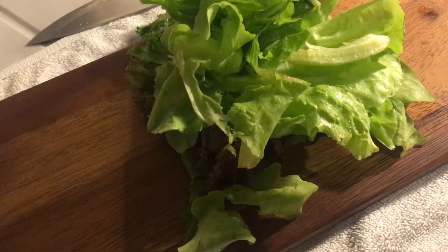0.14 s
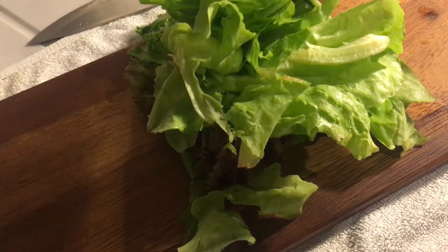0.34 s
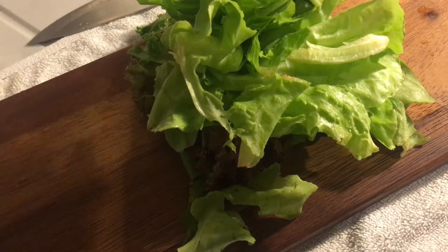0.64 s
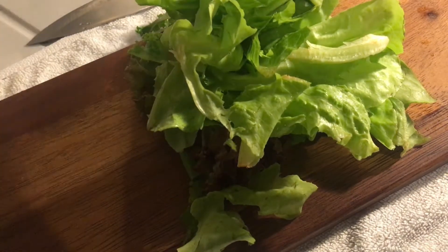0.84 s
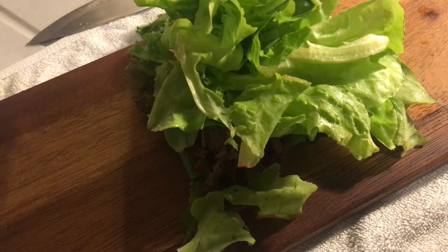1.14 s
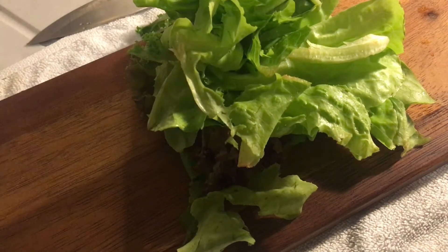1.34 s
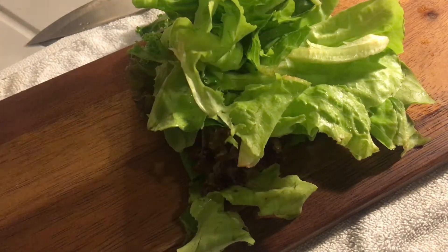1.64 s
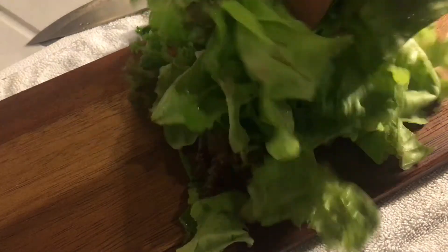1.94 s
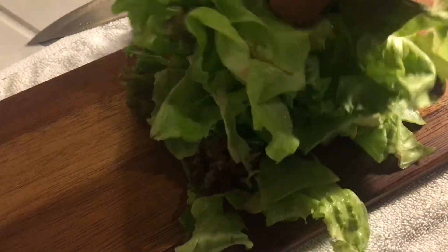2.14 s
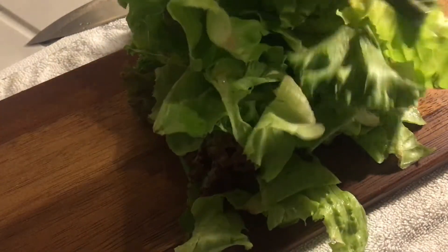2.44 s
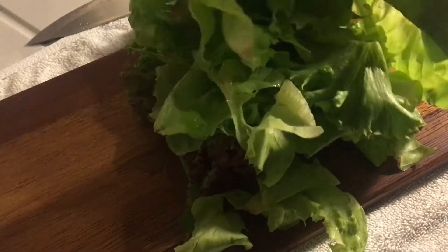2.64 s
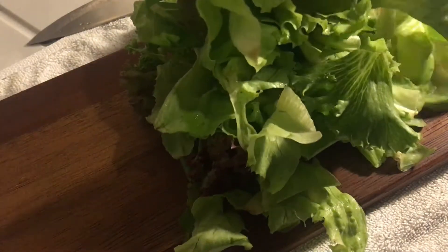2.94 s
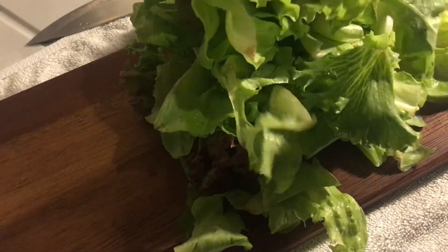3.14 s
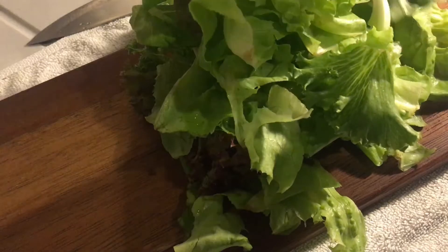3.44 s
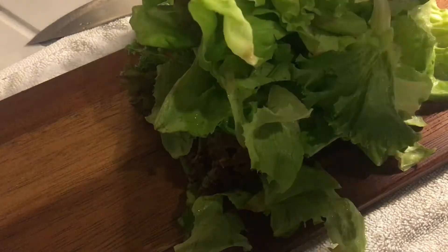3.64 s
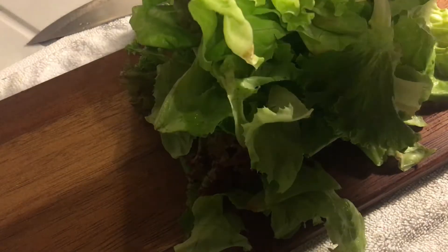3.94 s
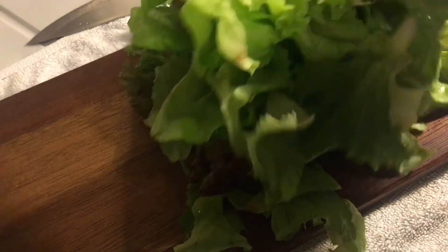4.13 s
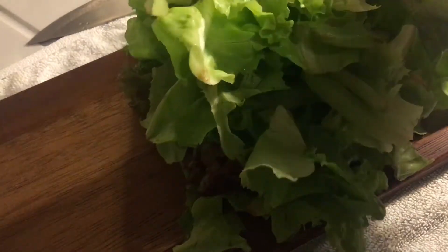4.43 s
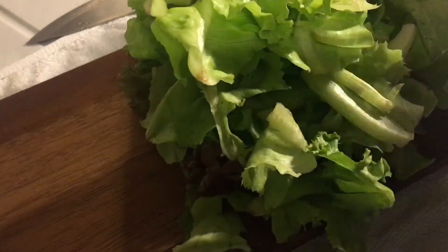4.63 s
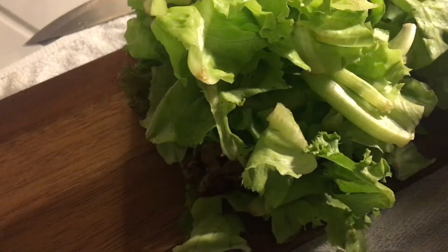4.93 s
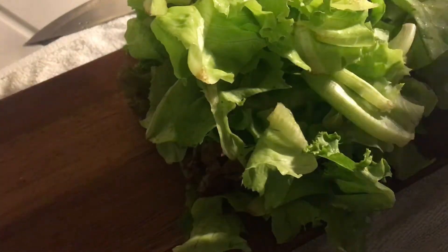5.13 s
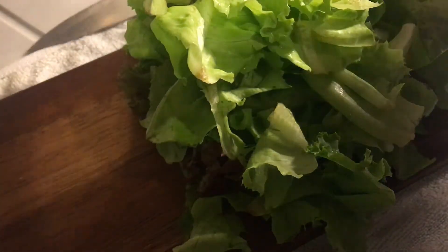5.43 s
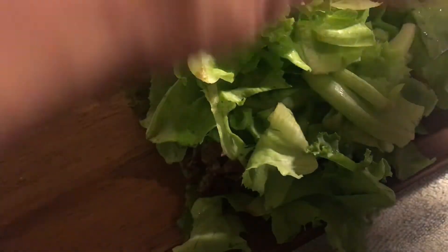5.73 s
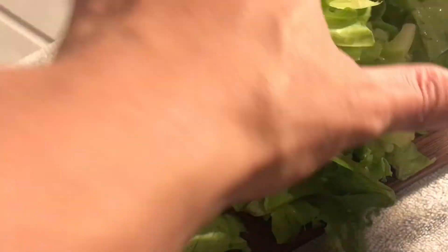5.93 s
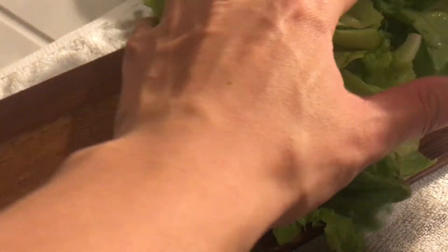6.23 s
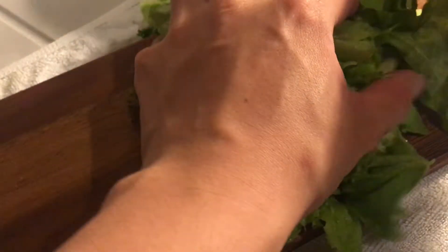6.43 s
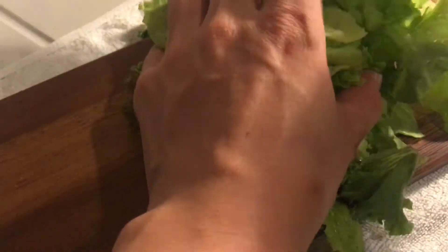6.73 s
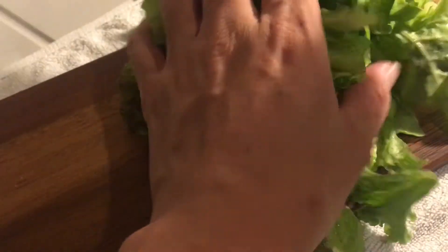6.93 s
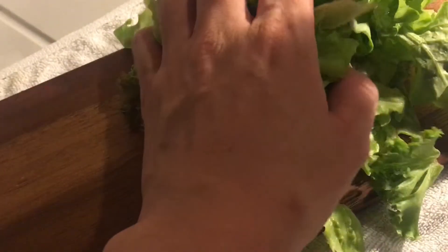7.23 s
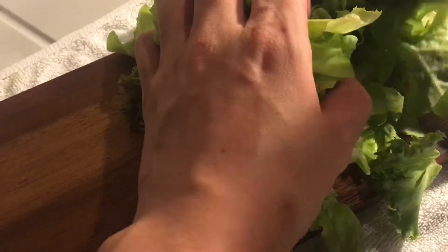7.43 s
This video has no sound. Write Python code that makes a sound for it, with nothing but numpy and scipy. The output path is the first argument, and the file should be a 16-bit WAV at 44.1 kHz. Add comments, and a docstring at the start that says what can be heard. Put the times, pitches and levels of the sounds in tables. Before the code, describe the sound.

Close to a small microphone in a kitchen, hands tear lettuce with a dense flurry of wet, crisp snaps and low board thuds. The crunching thins after about a second and a half, returns as softer crackles near three seconds, then drops to faint leaf sweeps. Late on come a squeaky rub, light rustling, a small board knock and a last crunch over low room rumble.

```python
"""Tearing lettuce in a kitchen

Hands tear and crumple lettuce on a wooden board, close to a small microphone.
Ribs snap as jerky noise bursts; leaves crackle with tiny pitched cracks, sweep as hiss and rub with a tone.
The board thuds with low noise and rings when knocked. Hum and hiss are filtered noise; echoes are sparse.
"""
import sys
import numpy as np
from scipy import signal
from scipy.io import wavfile
from scipy.ndimage import uniform_filter1d

SR = 44100
rng = np.random.default_rng(int(sys.argv[2]) if len(sys.argv) > 2 else 0)


def master(y):
    """Save y as 16-bit WAV."""
    cut = np.clip(np.atleast_2d(y).T, -1, 1)
    pcm = np.round(cut * 32767)  # scale
    wavfile.write(sys.argv[1], SR, pcm.astype(np.int16))


N = 333837
EDGE_HZ = 15800  # upper limit of the sound

# Colour of the kitchen's own sound. Each row: frequency in Hz, relative level per Hz in dB.
AIR_COLOUR = [(15, -32), (32, -10), (62, 2.5), (90, -2), (193, -10.5), (313, -11), (457, -18), (537, -18),
              (1050, -21.5), (1380, -28.5), (4260, -40.5), (4870, -44), (6050, -43.5), (10400, -50),
              (12800, -50.5), (15500, -53)]
# Hum of an appliance, a single row: frequency in Hz, width in Hz, level in dB.
APPLIANCE_HUM = (100.9, 6.7, -68)
# Weight of hands and leaves pressing on the board. Each row: start in seconds, time held in seconds,
# level in dB of the noisy part of the push.
BOARD_THUDS = [(0.0, 0.087, -44), (0.168, 0.17, -54), (0.302, 0.085, -50), (0.646, 0.093, -43),
               (0.746, 0.007, -34), (.785, 0.005, -41.5), (0.858, 0.098, -51), (1.322, 0.0061, -45),
               (2.697, 0.06, -50), (2.829, 0.1, -55.5), (2.982, 0.03, -59)]
# How the board rings. Each row: frequency in Hz, relative level in dB, time to fade by 60 dB in seconds.
BOARD_MODES = [(550, -4, .04), (805, 0, .055), (1170, -4, .04), (1945, -11, .03), (2735, -8, .016)]
# Fingertip knocking the board. Each row: start in seconds, level in dB of a 0 dB board mode.
BOARD_TAPS = [(7.2933, -25.5)]
# Colour of leaf sound at the microphone. Each row: frequency in Hz, relative level per Hz in dB.
LEAF_COLOUR = [(240, -7.5), (459, -1.5), (1220, 11), (1690, 2.5), (1930, 1), (2430, -4), (3570, -8),
               (4920, -15), (6280, -13.5), (10400, -20), (13500, -21.5), (15500, -21.5)]
# Leaf sweeping smoothly over leaf. Each row: middle in seconds, length in seconds,
# level of the middle band in dB, treble in dB relative to that.
LEAF_SWEEPS = [(3.993, 0.11, -73.5, 1.5), (4.092, 0.14, -61, -1.5), (4.258, 0.2, -72, -3),
               (4.646, 0.036, -77.5, 3.5), (5.063, 0.11, -68.5, -18), (5.277, 0.14, -72, -14),
               (5.55, 0.057, -73, 1.5)]
# A wet leaf sliding with a narrow rubbing tone. Each row: start in seconds, level in dB, tone in Hz.
LEAF_RUBS = [(6.047, -48.5, 720), (6.118, -58.5, 696), (6.205, -61.5, 737), (6.255, -57.5, 770)]
# Leaves moving in the hands, one spell a row. Each row: hollow part in dB and treble in dB, both relative
# to the middle band, then that band's level curve as pairs of time in seconds and level in dB.
HANDLING_SPELLS = [ (2.2, -7.5, [(0.0, -43), (0.3, -57), (0.88, -50), (0.98, -52.5), (1.13, -68),
                   (1.6, -72)]), (0.78, -0.5, [(1.7, -80), (1.76, -60), (1.95, -60), (2.2, -70.5),
                   (2.37, -75), (2.61, -71), (2.82, -58), (3.12, -79), (3.5, -77)]), (2.7, 1.5, [(5.8, -79),
                   (5.87, -71), (6.17, -68.5), (6.47, -66), (6.7, -63), (6.76, -78), (6.89, -67),
                   (7.0, -74.5)]), (3.7, 3, [(7.08, -65.5), (7.15, -66), (7.28, -53.5), (7.35, -71),
                   (7.57, -45.5)]), ]
# Ribs and veins that break. Each row: start in seconds, strength in dB, leaf ring in dB and treble in dB
# over the strength (all before the fixed trims in snaps), ring in Hz, time to fade by 60 dB in seconds.
RIB_SNAPS = [(0.0339, -17, -7, -14, 1160, 0.076), (0.0423, -21.5, -7, -8, 1140, 0.059),
             (0.0508, -17, -4, -18.5, 1080, 0.11), (0.0582, -24.5, -1.5, -29, 1090, 0.068),
             (0.092, -30, -7, -11, 1070, 0.037), (0.153, -29, -25, -2, 1050, 0.037),
             (0.2202, -32, -3, -27, 990, 0.14), (0.246, -32, 4.5, -19, 1050, 0.13),
             (0.2837, -31.5, -5, -4, 1220, 0.026), (0.2909, -26, -18, -7, 1060, 0.057),
             (0.3273, -23, -10, -15, 1170, 0.069), (0.3367, -21.5, -22, -4.5, 1860, 0.025),
             (0.345, -21, -13, -13, 1700, 0.031), (0.353, -18, -16, -35, 1160, 0.039),
             (0.362, -28.5, -7, -4, 1940, 0.067), (0.383, -20, -16, -4, 2240, 0.015),
             (0.4395, -38.5, 7, -11, 1085, 0.049), (0.476, -38.5, 1.5, 10.5, 2520, 0.021),
             (0.5694, -37, 3, -13, 1070, 0.066), (0.597, -30.5, -9.5, 2.5, 1120, 0.051),
             (0.6582, -24.5, -10, -16.5, 1230, 0.034), (0.668, -25, -8, -12.5, 920, 0.11),
             (0.6938, -22.5, -11.5, -12, 706, 0.039), (0.711, -29, -3, -13, 1510, 0.049),
             (0.72, -23, -9, -15, 1260, 0.059), (0.7279, -19.5, -17, -17, 1000, 0.084),
             (0.732, -29.5, -6, -7, 1020, 0.036), (0.7432, -25, -2, -14, 1400, 0.032),
             (0.748, -12.5, -13, -15.5, 910, 0.027), (0.7699, -33, -26, -3, 810, 0.093),
             (0.884, -27, -6.5, -15.5, 1240, 0.032), (0.9657, -30, 4, -11.5, 1160, 0.079),
             (1.0058, -20, -9.5, -16, 980, 0.043), (1.0453, -34.5, -12, -15, 727, 0.061),
             (1.0697, -37, -3, -23, 740, 0.081), (1.1288, -38.5, -0.5, 0, 1830, 0.022),
             (1.2025, -39.5, -10, -10.5, 1003, 0.055), (1.3275, -32.5, -8, -11, 1120, 0.031),
             (1.3434, -55, 8, -28, 970, 0.047), (1.401, -22, -12.5, -19, 1090, 0.045),
             (1.487, -43, -7, -11.5, 940, 0.028), (1.7145, -26.5, -10, -14.5, 1290, 0.074),
             (1.8803, -40.5, -2, -13, 1190, 0.095), (1.8952, -35, -7, -9, 875, 0.057),
             (1.9089, -34, -22, -5.5, 1870, 0.083), (1.9233, -37, 0.5, -12, 1690, 0.022),
             (1.9469, -41, -2, -9.5, 1810, 0.18), (2.024, -41.5, -3.5, -19, 2010, 0.039),
             (2.0354, -36.5, -10, -30, 2220, 0.035), (2.041, -43, 2, -24, 2370, 0.049),
             (2.118, -54, 1, -30, 2200, 0.023), (2.18, -49.5, -3, -21, 1810, 0.16),
             (2.284, -41, -11, -22, 1170, 0.048), (2.587, -38, -2, -18, 1070, 0.096),
             (2.596, -39, -7, -7.5, 2500, 0.081), (2.63, -39.5, -7, -4.5, 1140, 0.097),
             (2.7064, -26.5, -1, -19, 970, 0.113), (2.7402, -23, -14, -11.5, 930, 0.053),
             (2.833, -33, -1, -7.5, 1160, 0.12), (2.8773, -36, 4, -17, 1140, 0.068),
             (2.942, -39, -19, -23, 947, 0.097), (2.987, -38.5, -2, -25, 850, 0.14),
             (3.08, -41.5, -8, -26, 880, 0.025), (3.097, -51.5, 1.5, -23, 890, 0.046),
             (3.157, -41.5, -1.5, -22, 1070, 0.08), (3.29, -63, -1, -19, 5330, 0.055),
             (3.4366, -49.5, -21, -26, 1050, 0.046), (4.247, -47.5, -5, -13, 1290, 0.082),
             (5.006, -44.5, -13, -22, 1930, 0.088), (5.017, -43, -2.5, -24, 980, 0.09),
             (5.2063, -44.5, -0.5, -26, 950, 0.051), (6.113, -38.5, -19, -12, 692, 0.031),
             (6.3053, -35.5, -30, -29, 1310, 0.022), (6.3242, -43, -5, -23, 1120, 0.032),
             (6.337, -37.5, -9, -15, 1630, 0.045), (6.354, -38.5, -15, -13, 1490, 0.045),
             (6.367, -51, 0, -10, 4360, 0.058), (6.3928, -35, -10.5, -12.5, 1090, 0.032),
             (6.4345, -38, -9.5, -30, 1130, 0.023), (6.572, -53.5, -4, 3.5, 1060, 0.026),
             (6.6078, -40.5, -36, -1, 1070, 0.025), (6.768, -49, -5, -13, 1950, 0.022),
             (6.8027, -47.5, -8, -12, 2000, 0.042), (6.8284, -47.5, -1, -8, 1570, 0.13),
             (7.101, -52, -2.5, 3.5, 4170, 0.051), (7.12, -50, -11, 5.5, 4200, 0.036),
             (7.2042, -46.5, -7, 10, 3640, 0.034), (7.22, -43, -2.5, -4, 4140, 0.052),
             (7.268, -53, 7, -25, 710, 0.09), (7.2755, -43.5, 5, -10, 3670, 0.046),
             (7.336, -49.5, -22, 5, 832, 0.019), (7.4349, -50.5, 2, 4, 4800, 0.041),
             (7.4795, -44, -4.5, -15, 1830, 0.037), (7.5185, -27.5, -10, -16, 710, 0.048),
             (7.5288, -40.5, -14, 5, 3950, 0.025), (7.5541, -35.5, -1, -9, 960, 0.046)]


def amp(db):
    """Turns decibels into a plain multiplier."""
    return 10 ** (np.asarray(db) / 20)


def evened(x):
    """Scales a sound to an average (RMS) level of 1."""
    return x / np.sqrt(np.mean(x ** 2) + 1e-20)


def add(mix, start_s, sound):
    """Mixes a sound in at its start time, cutting off what runs past the end."""
    part = mix[round(start_s * SR):][:len(sound)]
    part += sound[:len(part)]


def band(x, lo_hz, hi_hz):
    """Keeps mainly the frequencies between two limits."""
    sos = signal.butter(2, [lo_hz, hi_hz], "bandpass", fs=SR, output="sos")
    return signal.sosfilt(sos, x)


def colour(points):
    """Builds a filter with the given spectrum and unit energy, which never sounds before its input."""
    point_hz, point_db = np.transpose(points)
    hz = abs(np.fft.fftfreq(8192, 1 / SR))
    db = np.interp(np.log(hz + 1), np.log(point_hz), point_db)
    log_gain = np.log(amp(np.maximum(db, -100)))
    # this choice of phase puts the filter's energy as early as possible
    spectrum = np.exp(np.conj(signal.hilbert(log_gain)))
    response = np.fft.ifft(spectrum).real[:4096]
    return response / np.linalg.norm(response)


def resonate(x, hz, width_hz):
    """Shifts hz down to zero, smooths and shifts back: a resonance that may move."""
    turn = np.exp(2j * np.pi * np.cumsum(hz * np.ones(len(x))) / SR)
    keep = np.exp(-np.pi * width_hz / SR)
    smooth = signal.lfilter([1 - keep], [1, -keep], x / turn)
    return 2 * (turn * smooth).real


def leaf_parts(drive):
    """Colours a driving sound as leaves do, then picks out its hollow, middle and treble parts."""
    x = signal.oaconvolve(drive, colour(LEAF_COLOUR))[:N]
    return band(x, 434, 1480), band(x, 1924, 7070), band(x, 4410, EDGE_HZ)


def air():
    """Steady low rumble and faint hiss from coloured noise; a narrow resonance makes the wavering hum."""
    # drop the filter's start-up so the noise is steady from the first moment
    noise = signal.oaconvolve(rng.standard_normal(N + 4096), colour(AIR_COLOUR))[4096:][:N]
    hz, width_hz, hum_db = APPLIANCE_HUM
    hum = resonate(resonate(rng.standard_normal(N), hz, width_hz), hz, width_hz)
    return amp(-57) * evened(noise) + amp(hum_db) * evened(hum)


def kitchen(x):
    """Sparse echoes of random sign; the treble and deepest bass die sooner than the rest."""
    echoes = np.zeros(SR // 2)
    slots = np.arange(100, len(echoes) - 20, 20)
    # one echo at a random place in each 20-sample slot
    echoes[slots + rng.integers(0, 20, len(slots))] = rng.choice([-1., 1.], len(slots))
    t = np.arange(len(echoes)) / SR
    dull = band(echoes, 230, 2597)
    # times in seconds to fade by 60 dB
    dull_t60, rest_t60 = 0.31, 0.25
    tail = dull * amp(-60 * t / dull_t60) + (echoes - dull) * amp(-60 * t / rest_t60)
    return signal.oaconvolve(x, tail / np.linalg.norm(tail))[:N]


def thuds():
    """Low uneven pushes that the board passes on: each builds up, holds, then lets go."""
    press_s, lift_db_per_s = 0.0099, 350.5
    out = np.zeros(N)
    t = np.arange(SR // 2) / SR
    for start_s, held_s, db in BOARD_THUDS:
        shove = rng.standard_normal(len(t))
        # the resonance is the lowest bending of the board
        push = evened(band(shove, 37, 328) + 1.1 * resonate(shove, 121, 91))
        # it swings at first contact
        push += 0.75 * np.sin(2 * np.pi * 112 * t) * np.exp(-(t / 0.11) ** 2)
        lift = lift_db_per_s * np.maximum(t - press_s - held_s, 0)
        weight = np.minimum(t / press_s, 1) * amp(db - lift)
        add(out, start_s, weight * push)
    return out


def taps():
    """A short knock sets the modes of the board ringing as fading sine waves."""
    t, out = np.arange(4000) / SR, np.zeros(N)
    ring = np.zeros(len(t))
    for hz, db, t60 in BOARD_MODES:
        ring += amp(db - 60 * t / t60) * np.sin(2 * np.pi * hz * t)
    onset = np.minimum(t / 0.00091, 1)
    for start_s, db in BOARD_TAPS:
        add(out, start_s, -amp(db) * ring * onset)
    return out


def sweeps():
    """Even friction makes leaf-coloured hiss that swells and fades."""
    hollow, middle, treble = map(evened, leaf_parts(rng.standard_normal(N)))
    t, out = np.arange(N) / SR, np.zeros(N)
    for middle_s, length_s, db, treble_db in LEAF_SWEEPS:
        swell = amp(db) * np.exp(-abs(2 * (t - middle_s) / length_s) ** 3)
        out += swell * (middle + amp(-1.0) * hollow + amp(treble_db) * treble)
    return out


def rub():
    """Uneven slips excite three hollows of the leaf; each slide catches quickly, then eases off."""
    catch_s, ease_db_per_s = 0.0018, 138
    t, out = np.arange(SR // 2) / SR, np.zeros(N)
    for start_s, db, hz in LEAF_RUBS:
        # about 2500 slips per second
        slips = rng.standard_normal(len(t)) * (rng.random(len(t)) < 2500 / SR)
        tone = resonate(slips, hz, 58)
        tone += amp(1) * resonate(slips, 1.07 * hz, 45)
        tone += amp(-13) * resonate(slips, 1.56 * hz, 110)
        level = np.minimum(t / catch_s, 1) * amp(db - ease_db_per_s * t)
        add(out, start_s, level * evened(tone))
    return out


def rustle():
    """Tiny pitched cracks of very unequal size come in clumps over the brushing of leaf on leaf."""
    t, short_t = np.arange(N) / SR, np.arange(400) / SR
    wander = uniform_filter1d(uniform_filter1d(rng.standard_normal(N), 700), 700)
    clumps = amp(2.16 * evened(wander))
    # about 700 cracks per second
    size = amp(5 * np.minimum(rng.exponential(1, N), 2.7)) * (rng.random(N) < 700 / SR)
    pitches_hz = np.geomspace(500, 13000, 24)
    kind, cracks = rng.integers(0, len(pitches_hz), N), np.zeros(N)
    for k, hz in enumerate(pitches_hz):
        puff = rng.standard_normal(len(short_t)) * np.exp(-short_t / 0.0008)
        burst = resonate(puff, hz, 0.6 * hz)
        cracks += signal.oaconvolve(size * (kind == k), np.sqrt(hz) * evened(burst))[:N]
    brushing = 0.35 * rng.standard_normal(N)
    hollow, middle, treble = map(evened, leaf_parts((evened(cracks) + brushing) * clumps))
    out = np.zeros(N)
    for hollow_db, treble_db, curve in HANDLING_SPELLS:
        s, db = np.transpose(curve)
        # outside the spell the leaves settle, in dB per second
        settle_db = 720 * np.maximum(t - s[-1], 0) + 270 * np.maximum(s[0] - t, 0)
        level = amp(np.interp(t, s, db) - settle_db)
        out += level * (middle + amp(hollow_db) * hollow + amp(treble_db) * treble)
    return out


def snaps():
    """Each break starts quickly and frays out in jerks; the cupped leaf rings for a few cycles."""
    middle, treble, hollow = np.zeros((3, N))
    t = np.arange(4000) / SR
    for start_s, db, ring_db, treble_db, hz, t60 in RIB_SNAPS:
        # long tears build up, short ones crack
        rise_s = 0.306 * t60 ** 2
        fade = amp(db - 60 * t / np.clip(t60, .004, .3)) * np.minimum(t / rise_s, 1)
        # the main fibre lets go first
        tick = 1 + 0.58 * np.exp(-t / 0.00017)
        # then smaller ones, unevenly: a new strength every 40 samples
        slips = np.repeat(rng.standard_normal(len(t) // 40), 40)
        jerks = amp(3.4 * slips - 1)
        fray = 0.71 * fade * tick * jerks * rng.standard_normal(len(t))
        # every rib has a pitch of its own
        own = resonate(fray, rng.uniform(1740, 6600), 1400)
        add(middle, start_s, 0.85 * fray + 0.14 * own)
        # the thinnest fibres part first
        thin = amp(treble_db + 13 - 50 * np.minimum(t, .012))
        add(treble, start_s, thin * fray)
        # the first crack is one push
        push = amp(db + 6.0 - 69.5 * t60) * np.exp(-((t - .0003 - rise_s) / 0.00018) ** 2)
        blow = fray - push
        # the ring's pitch wavers at random, so it sounds less like a pure tone
        waver_hz = hz * (1 + 0.2 * uniform_filter1d(slips, 200))
        ring = resonate(resonate(blow, waver_hz, 0.31 * hz), hz, 1.87 * hz)
        add(hollow, start_s, amp(ring_db + 10.5) * ring)
        # the bunch of leaves gives it body
        add(hollow, start_s, amp(ring_db - 4) * band(blow, 216, 590))
    return leaf_parts(middle)[1] + amp(2.5) * leaf_parts(treble)[2] + hollow


def scene():
    """Adds echoes to the sounds near the microphone, then the board's thuds and the kitchen air."""
    near = snaps() + taps() + rustle() + rub() + sweeps()
    # two echo patterns trade places to keep the room's colour uneven, 1.7 cycles per second
    turn = 2 * np.pi * 1.7 * np.arange(N) / SR
    echoes = kitchen(near * np.cos(turn)) + kitchen(near * np.sin(turn))
    return (near + amp(-11) * echoes + thuds() + air())[None]


def record(dry):
    """The small microphone loses the deepest bass; a steep filter then removes the highest treble."""
    bass_cut = signal.butter(2, 38, "highpass", fs=SR, output="sos")
    dry = signal.sosfilt(bass_cut, dry)
    treble_cut = signal.firwin(511, EDGE_HZ, window=("kaiser", 9), fs=SR)
    return signal.oaconvolve(dry, treble_cut[None], "same")


dry = scene()
out = record(dry)
master(out)
```